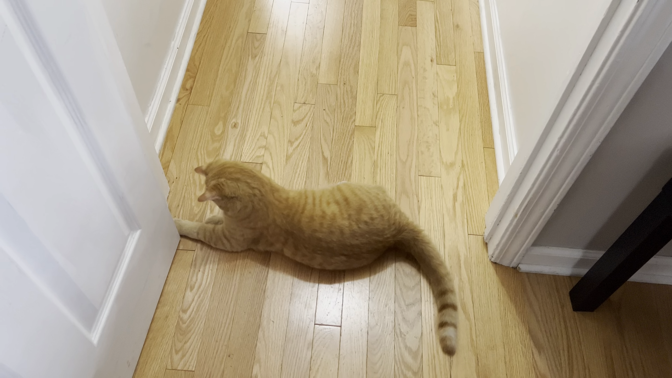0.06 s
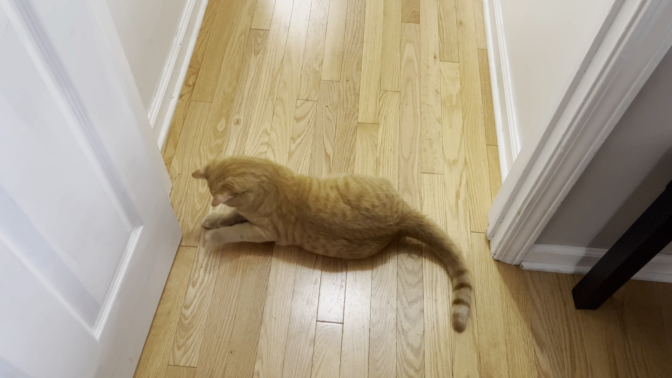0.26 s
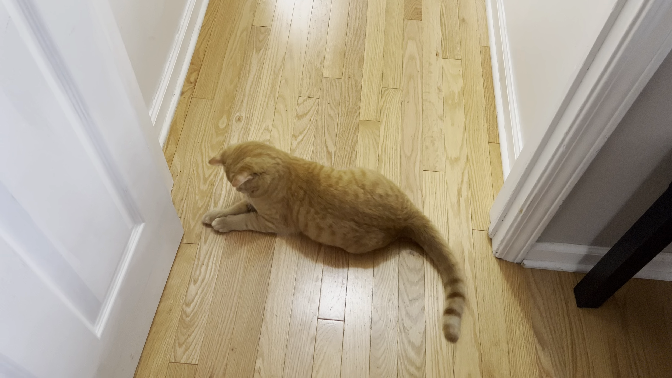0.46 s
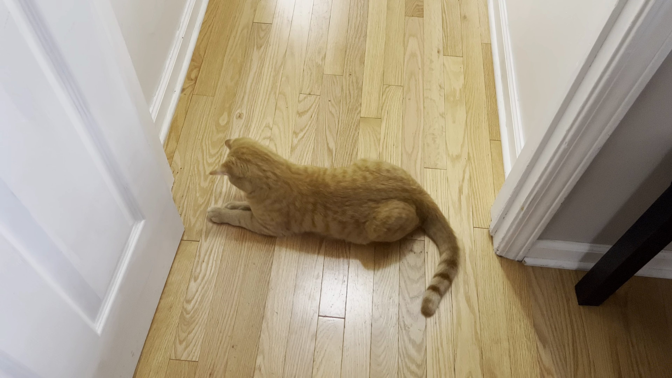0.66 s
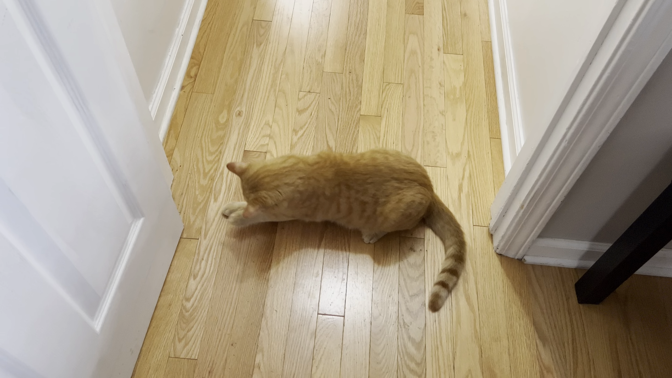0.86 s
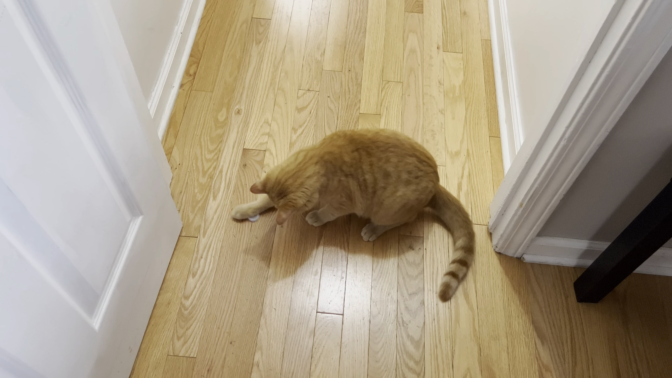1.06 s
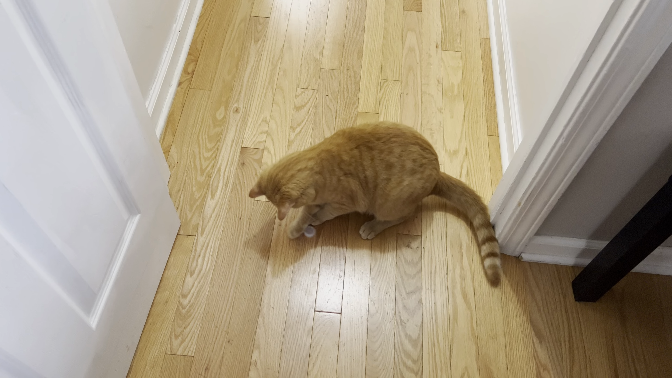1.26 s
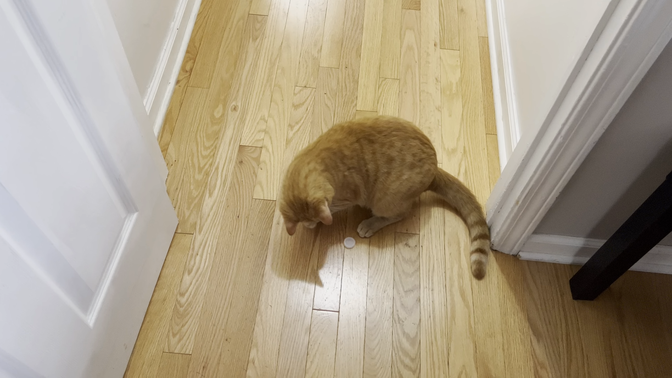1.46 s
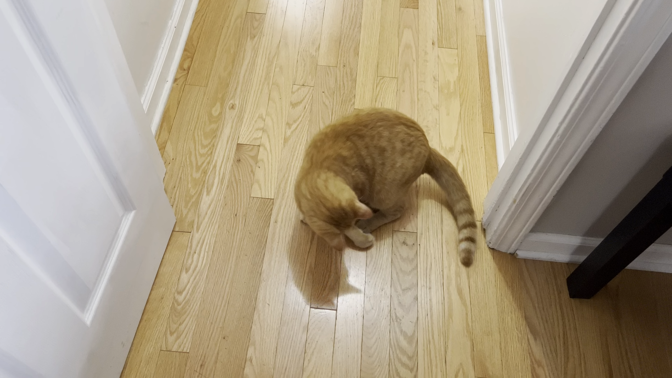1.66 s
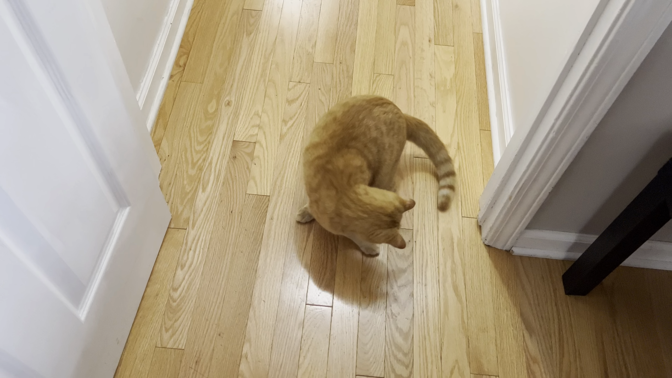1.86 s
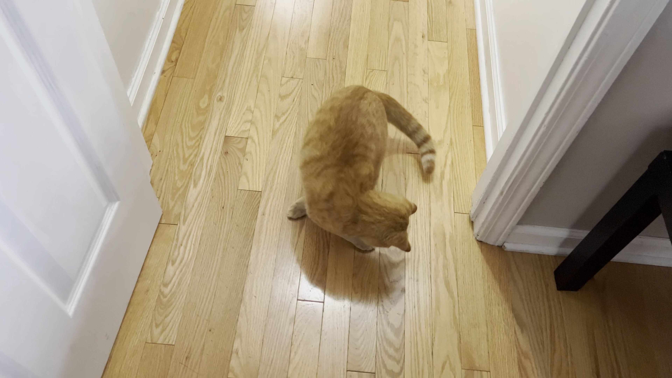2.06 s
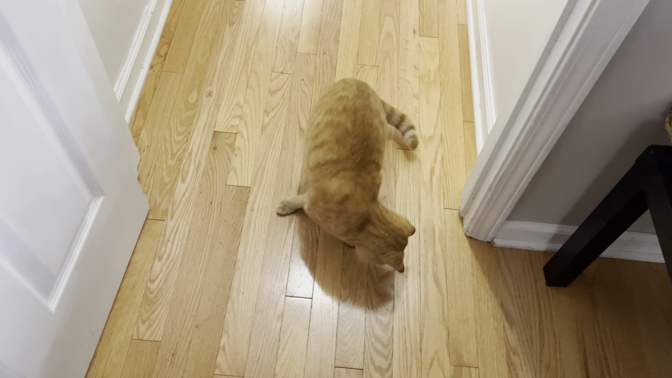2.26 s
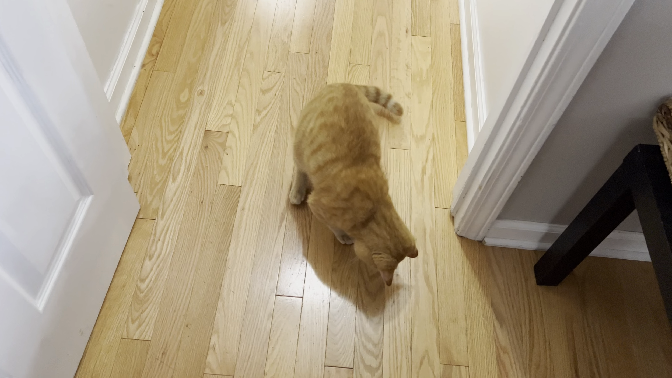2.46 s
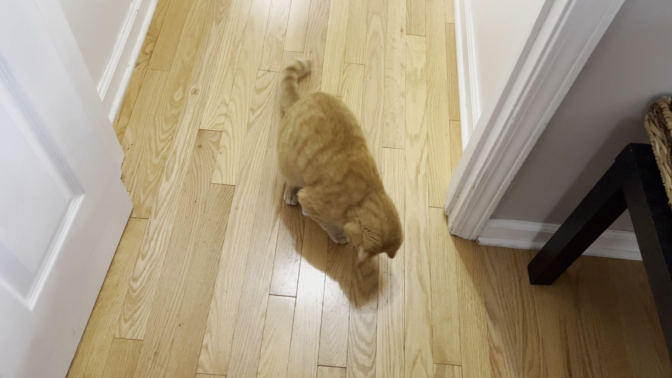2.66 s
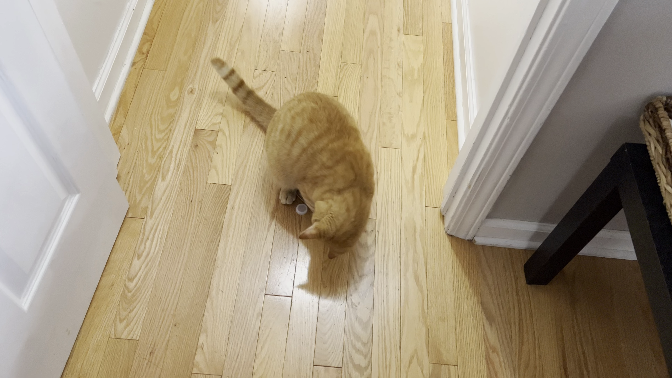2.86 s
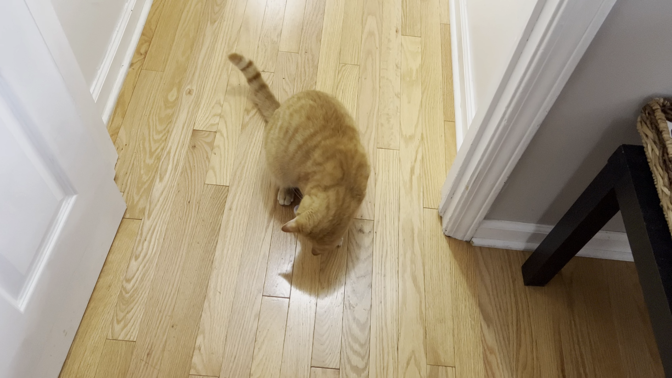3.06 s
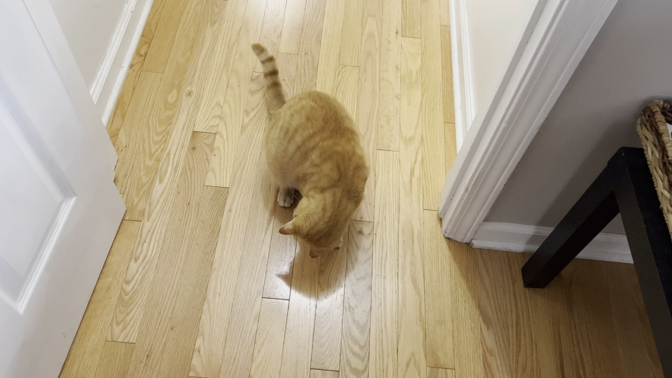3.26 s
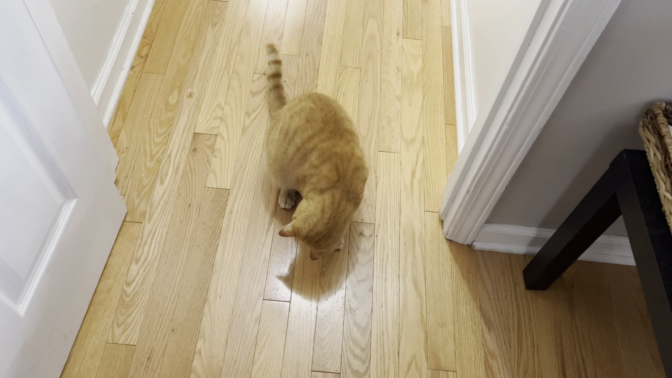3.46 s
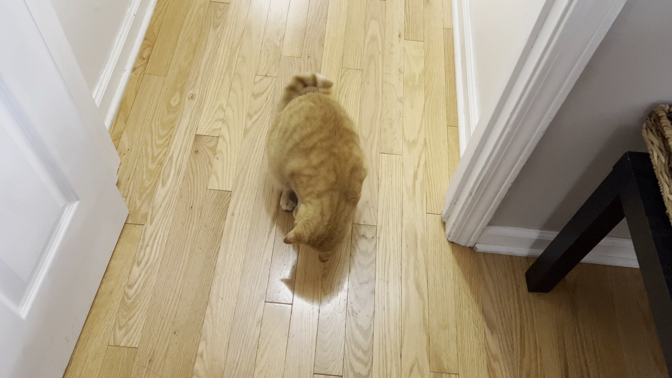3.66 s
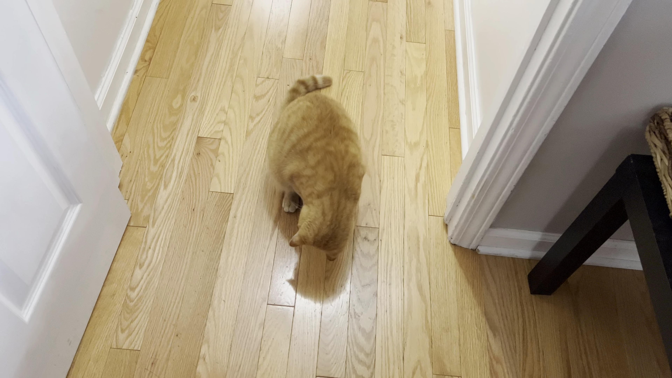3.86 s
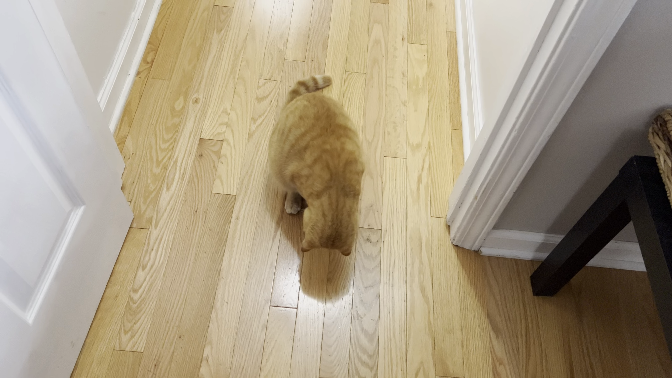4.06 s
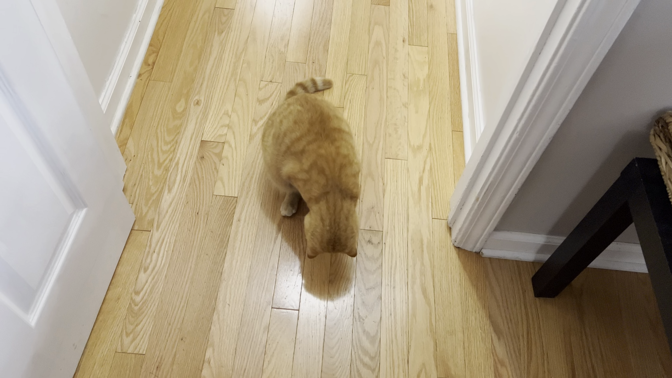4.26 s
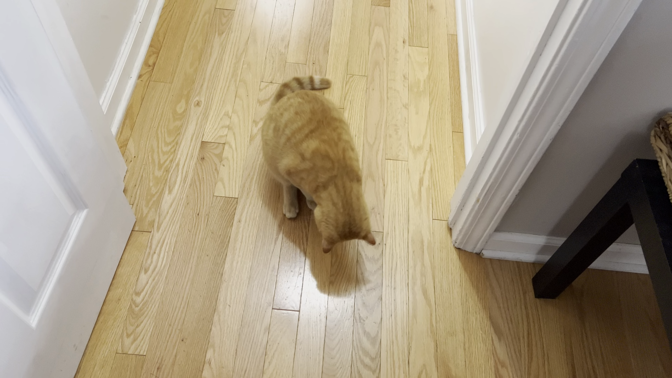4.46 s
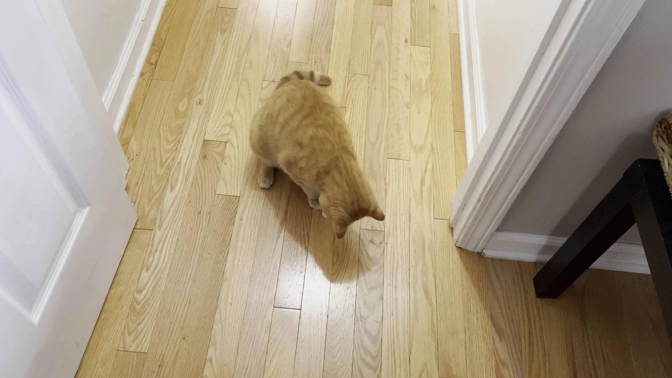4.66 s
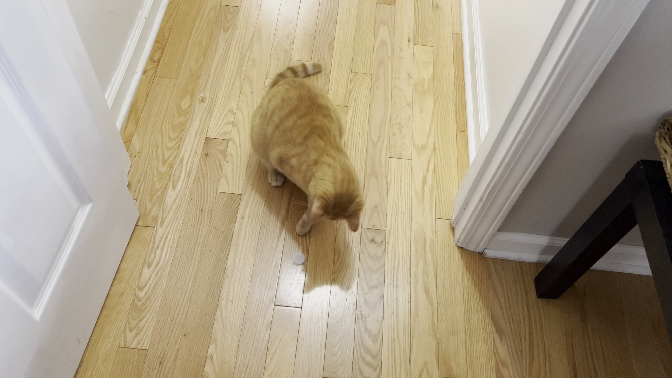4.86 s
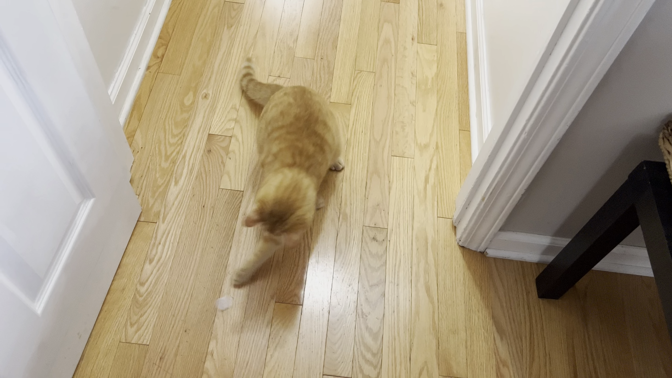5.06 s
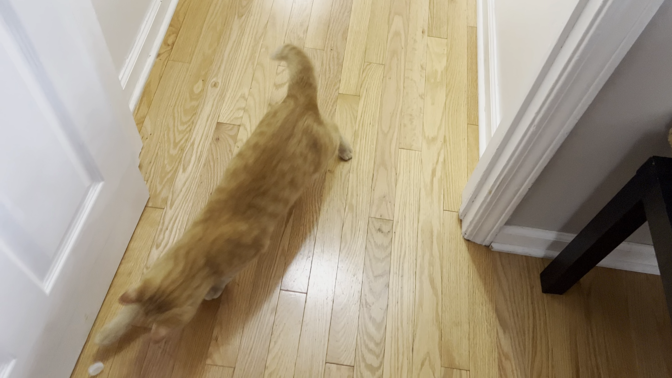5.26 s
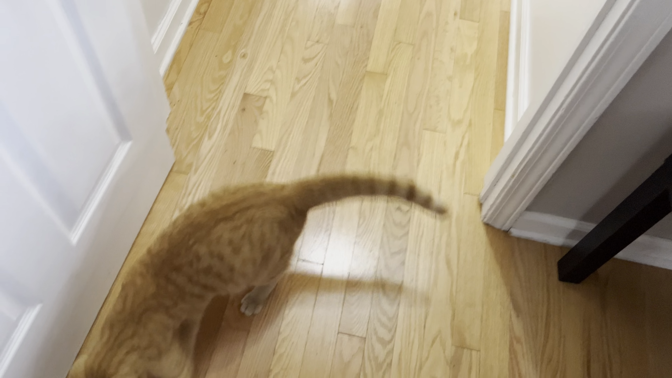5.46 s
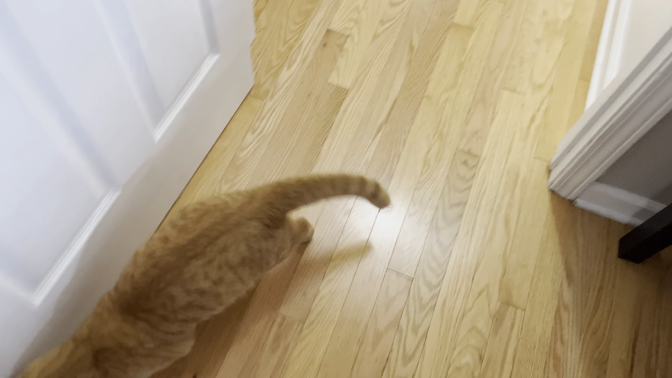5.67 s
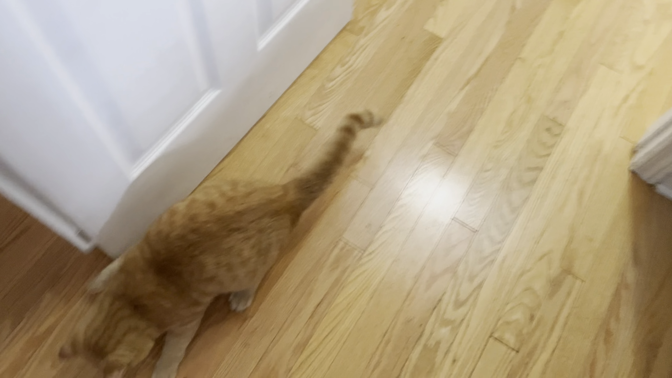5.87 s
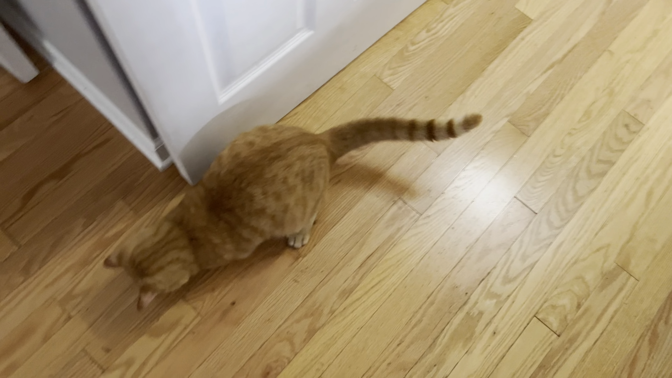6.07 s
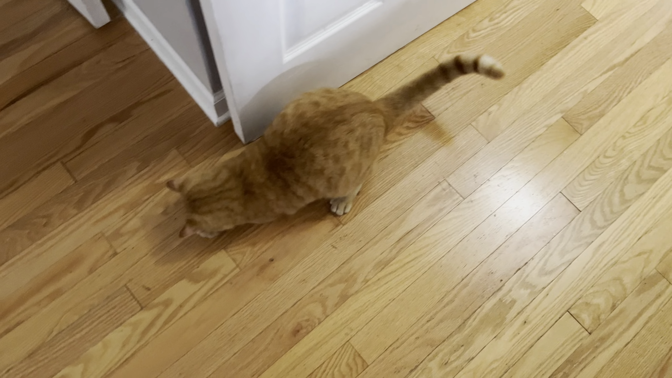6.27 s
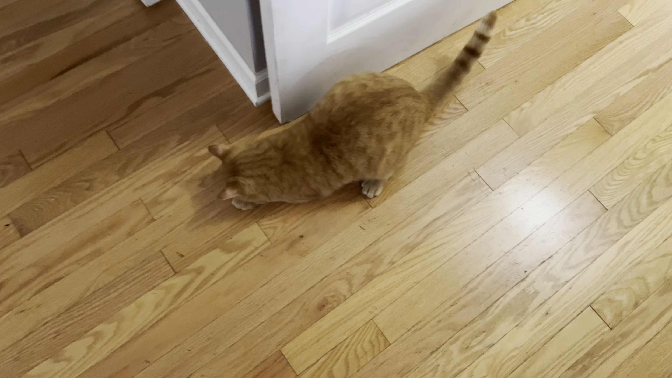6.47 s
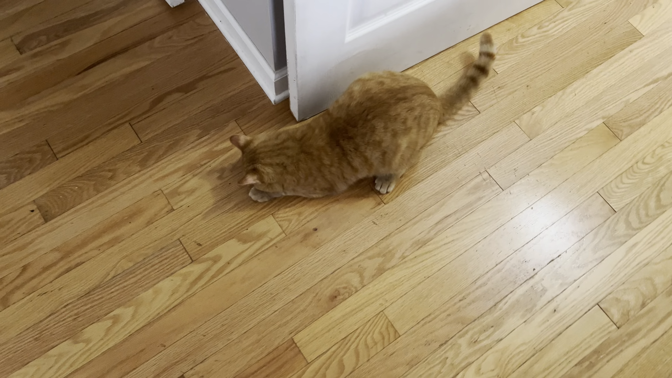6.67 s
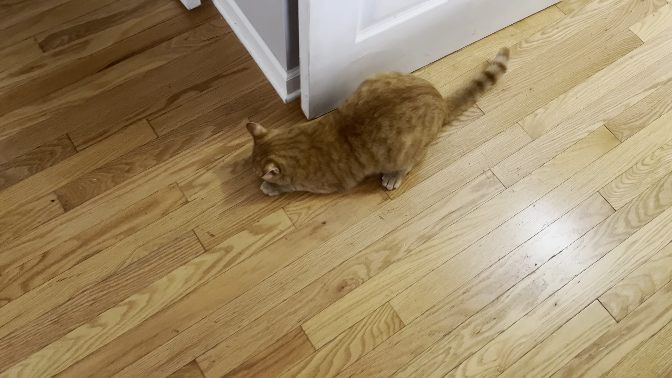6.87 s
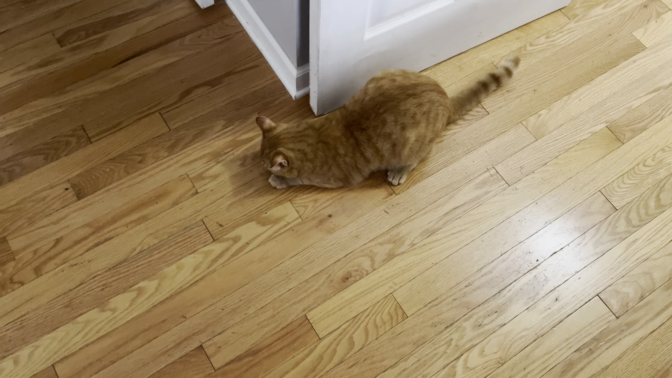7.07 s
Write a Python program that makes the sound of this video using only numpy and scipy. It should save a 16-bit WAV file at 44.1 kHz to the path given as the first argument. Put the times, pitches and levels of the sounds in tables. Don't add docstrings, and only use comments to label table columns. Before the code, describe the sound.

Light claw ticks and dry scratches on hardwood come first, followed by a harder swipe and the brittle click of a plastic cap. After scattered taps and near silence, the cat pounces: rapid clattering, scraping, dull paw thuds and a hollow door bump. A few softer scrapes and ticks end it. The indoor hallway gives short reverberation; the handheld microphone picks up handling rumble and quiet left-sided hiss.

```python
import sys
import numpy as np
from scipy import signal
from scipy.fft import rfft, irfft, next_fast_len
from scipy.io import wavfile
from scipy.ndimage import map_coordinates

SR = 44100
rng = np.random.default_rng(int(sys.argv[2]) if len(sys.argv) > 2 else 0)


def generate_wav(signal):
    frames = np.transpose(np.atleast_2d(signal))
    scaled = np.clip(frames, -1, 1) * 32767
    pcm = np.round(scaled).astype(np.int16)
    wavfile.write(sys.argv[1], SR, pcm)


def nominal_scale(level):
    x = np.asarray(level, float) / 20
    return 10 ** x


N = 313917
RIM_HZ = 13050


def unit(x):
    return x / np.sqrt(np.mean(x ** 2) + 1e-20)


def along(points, hz):
    f, v = np.transpose(points)
    return np.interp(np.log(hz + 1), np.log(f + 1), v)


def curves(rows):
    s, *cols = np.transpose(rows)
    return [np.interp(np.arange(N) / SR, s, c) for c in cols]


def filtered(x, response):
    m = next_fast_len(x.shape[-1] + 8192)
    return irfft(rfft(x, m) * response(np.fft.rfftfreq(m, 1 / SR)), m)[..., :x.shape[-1]]


def modes(table):
    def response(f):
        total = 0
        for k, (centre, width, db) in enumerate(table):
            resonance = 1j * f * width / (centre * centre - f * f + 1j * f * width)
            total = total + (-1) ** k * nominal_scale(db) * resonance
        return total
    return response


def ring(table):
    pulse = irfft(modes(table)(np.fft.rfftfreq(1024, 1 / SR)) ** 2)[:512]
    return pulse / np.linalg.norm(pulse)


def causal(spectrum):
    cep = irfft(np.log(nominal_scale(along(spectrum, np.fft.rfftfreq(1024, 1 / SR)))))
    cep[1:512] *= 2
    cep[513:] = 0
    pulse = irfft(np.exp(rfft(cep)))[:512]
    return pulse / np.linalg.norm(pulse)


def pair(alike):
    turn = lambda hz: np.arccos(np.clip(along(alike, hz), -1, 1)) / 2
    return lambda hz: np.array([np.cos(turn(hz)), np.sin(turn(hz))])


def swells(rows, steep=1):
    climb_db, tire_s = 20, .3
    t = np.arange(0, N + 32, 32) / SR
    s, peak_db, rise, fade = np.transpose(rows)[:, :, None]
    late = np.maximum(t - s, 0)
    early = np.maximum(s - t, 0) / np.maximum(rise, .001)
    loss = climb_db * early * (1 + early) / 2 + abs(fade) * late * (1 + late / tire_s)
    return np.interp(np.arange(N) / SR, t, np.sqrt(np.sum(nominal_scale(peak_db - steep * loss) ** 2, 0)))


def voices(pushes):
    # frequency in Hz, level in dB.
    scrape_spectrum = [(300, -27), (750, -6), (1200, 1.5), (2200, -2.5), (3100, -5), (3900, -1),
                       (4200, -11.5), (6000, -45.5), (12000, -58)]
    # frequency in Hz, width in Hz, level in dB.
    cap_modes = [(3824, 250, 3), (5200, 130, -15)]
    # frequency in Hz, level in dB.
    tip_spectrum = [(9000, -34.5), (11000, -13), (12300, -6.5), (13100, -2.5), (13900, -3.5), (15700, -5),
                    (17000, -30.5)]
    # frequency in Hz, level in dB.
    rasp_spectrum = [(1800, -29.5), (2800, -28), (4400, 8), (5400, 0.5), (7000, -1), (9300, -13),
                     (11500, -41), (16000, -50)]
    cap = ring(cap_modes) + nominal_scale(-19.5) * ring([(RIM_HZ, 900, 0)])
    bodies = np.array([causal(scrape_spectrum), cap, causal(tip_spectrum), causal(rasp_spectrum)])
    return signal.oaconvolve(pushes, bodies, axes=1)[:, :N].sum(0)


def hush():
    # frequency in Hz, level in dB per Hz.
    air_spectrum = [(71, -24.5), (120, -7.5), (167, -26), (226, -11.5), (418, -23.5), (605, -24),
                    (789, -28.5), (1010, -9.5), (1240, -16.5), (1750, -3), (2990, -30), (4060, -23.5),
                    (4590, -31), (7350, -31.5), (11300, -45), (13300, -31), (14200, -50.5), (16000, -52)]
    # frequency in Hz, left over right in dB.
    left_over_right = [(60, -10.5), (110, 5), (200, 5.5), (380, 1.5), (700, 2), (1290, 17), (2380, 12.5),
                       (4400, 12.5), (8120, 15), (15000, -10.5)]
    # frequency in Hz, level in dB rms.
    whine_tones = [(3957, -87)]

    def response(hz):
        left = 1 / (1 + nominal_scale(-along(left_over_right, hz)) ** 2)
        return nominal_scale(along(air_spectrum, hz)) * np.sqrt([left, 1 - left])

    air = nominal_scale(-69) * unit(filtered(rng.standard_normal((2, N)), response))
    whine = sum(nominal_scale(db + 1) * np.sin(2 * np.pi * hz * np.arange(N) / SR) for hz, db in whine_tones)
    return air + whine * nominal_scale([[4], [-10]])


def weight():
    # frequency in Hz, level in dB per Hz.
    rumble_spectrum = [(12, -39.5), (20, -30), (36, -8.5), (54, 6.5), (95, -5.5), (113, -10), (160, -15),
                       (210, -59.5), (350, -120)]
    # frequency in Hz, width in Hz, level in dB.
    board_modes = [(148, 130, -1.5), (208, 116, 2.5), (285, 38.6, 1), (378, 65, -6.5), (504, 65, -6.5),
                   (853, 280, -10)]
    # time of peak in s, peak in dB, rise in s, fade in dB per s.
    loads = [(0.2, -68.5, .8, 15), (0.34, -55, 0.039, 130), (0.7, -62.5, 0.69, 50), (1.12, -65, 0.18, 21),
             (1.88, -70, 0.45, 26), (2.42, -74, 0.21, 24), (3.75, -65.5, 0.04, 96),
             (4.35, -62.5, 0.077, 95), (5.2, -61.5, 0.16, 93), (5.25, -36, 0.025, 204),
             (5.46, -48.5, 0.022, 64), (5.59, -35, 0.017, 103), (5.7, -46.5, 0.61, 46),
             (5.88, -46.5, 0.078, 24), (6.45, -64, 0.79, 21.5), (6.6, -49.5, 0.16, 34),
             (7.12, -58, 0.17, 97.5)]
    # time in s, level in dB.
    grip = [(0.0, -66.5), (0.4, -54.5), (1.25, -55.5), (1.45, -62.5), (1.85, -57), (2.3, -58), (3.9, -64),
            (5.3, -59.5), (5.9, -43.5), (6.2, -64.5), (6.33, -52), (6.45, -62.5), (6.62, -55.5),
            (6.94, -63)]
    tremor = map_coordinates(rng.standard_normal(N // 5000 + 4), [np.arange(N) / 5000])
    rumble_db = curves(grip)[0] - 6 + 2 * tremor
    load = np.hypot(swells(loads), nominal_scale(-77.5))
    alike = pair([(60, 0.95), (300, 0.79), (700, 0.087)])

    def board_response(hz):
        band = 1 / (1 + (hz / 1000) ** 4) / (1 + (110 / (hz + 1)) ** 4)
        return modes(board_modes)(hz) * alike(hz) * band

    low = filtered(rng.standard_normal((2, N)), lambda hz: nominal_scale(along(rumble_spectrum, hz)) * alike(hz))
    board = filtered(rng.standard_normal((2, N)), board_response)
    mid, side = np.sqrt(2) * (nominal_scale(rumble_db) * unit(low) + nominal_scale(-10.0) * load * unit(board))
    return np.array([mid + side, mid - side]) * nominal_scale([[1.1], [-1.1]])


def grains(rate, spread_db, hiss):
    slips = (rng.random(N) < rate / SR) * np.sign(rng.standard_normal(N)) * nominal_scale(spread_db * rng.random(N))
    return unit(unit(slips) + hiss * rng.standard_normal(N))


def strokes():
    # time of peak in s, peak in dB, rise in s, fade in dB per s, rasp in dB.
    scratches = [(0.057, -54, 0.19, 140, -12.5), (0.25, -59, 0.051, 146, -17),
                 (0.356, -60, 0.093, 194, -18), (0.54, -61, 0.022, 125, -16),
                 (0.648, -54, 0.019, 121, -7.5), (1.035, -58, 0.043, 302, -11), (1.106, -44, 0.054, 64, -3),
                 (2.503, -48.5, 0.054, 229, -10.5), (3.616, -51.5, 0.0046, 80, -9.5),
                 (4.94, -59, 0.07, 60, -28), (5.095, -63, 0.0041, 35, 4), (5.24, -61, .01, 124, 9),
                 (5.364, -52.5, 0.037, 300, -5.5), (5.788, -58.5, 0.0098, 152, 7.5),
                 (5.943, -57.5, 0.023, 300, 3.5), (5.985, -67, .012, 190, 9),
                 (5.583, -41, 0.0015, 500, -24), (5.601, -56.5, .004, 39, 2.5),
                 (6.199, -76, 0.046, 69, 5.5), (6.39, -69, 0.11, 96, 3.5), (6.509, -60.5, 0.034, 88, 3),
                 (6.7, -60.5, 0.18, 68, 0.5), (7.12, -66, 0.058, 106, -7)]
    # time of peak in s, peak in dB, rise in s, fade in dB per s, cap ring in dB.
    skids = [(1.062, -41.5, 0.0057, 46, -9), (1.16, -51, .08, 86, 5), (1.315, -57, 0.0035, 29, -5),
             (1.655, -47.5, 0.018, 190, -3.5), (1.795, -53.5, 0.017, 51, 5), (2.515, -60, 0.027, 50, 4.5),
             (2.665, -60.5, .01, 94, 3.5), (4.09, -67.5, 0.0036, 46.5, 5), (4.645, -67, 0.048, 402, -9),
             (4.7, -63.5, 0.015, 91, 3), (4.748, -58.5, 0.0066, 204, 4), (4.83, -55, 0.076, 294.5, 0.5),
             (4.888, -61, 0.015, 248.5, -2), (5.03, -53.5, 0.0066, 24, -6), (5.18, -58.5, 0.048, 66.5, 5.5),
             (5.238, -43, 0.087, 151, 9), (5.35, -68.5, .05, 54, 10), (5.52, -56, 0.2, 106, -9),
             (5.785, -44.5, 0.0082, 302, -10), (5.81, -57, 0.016, 30, 1.5), (5.98, -59, 0.3, 62, -1),
             (6.12, -68, 0.037, 10, 1.5), (6.685, -71, 0.016, 198, -24)]
    # time in s, gain of the tips in dB.
    claws_out = [(0.0, -2), (1.5, 0.5), (2.2, -6), (4.6, -8), (4.75, 1.5), (5.0, 2), (5.25, 2), (5.5, 12.5),
                 (5.65, 27.5), (5.8, 6), (6.3, 16), (7.12, 19)]
    scratch_cap_db, skid_rasp_db, tip_db = -15, -14.5, -15.5
    slow_hz, slow_db, hz_per_db = 1962, -64, 43.5
    dragged = [(*row[:4], scratch_cap_db, row[4]) for row in scratches]
    rows = np.array(dragged + [(*row, skid_rasp_db) for row in skids])

    def voice(over_db, steep):
        return swells(rows[:, :4] + np.outer(over_db + 0 * rows[:, 0], [0, 1, 0, 0]), steep)

    scrape = voice(0, 0.96)
    cap = voice(rows[:, 4], 1.5)
    tips = np.hypot(voice(tip_db, 1.3), nominal_scale(-100)) * nominal_scale(curves(claws_out)[0])
    rasp = voice(rows[:, 5], 1.44)
    pitch_hz = slow_hz + hz_per_db * np.maximum(20 * np.log10(scrape + 1e-9) - slow_db, 0)
    return np.array([scrape, cap, tips, rasp]), pitch_hz


def slide():
    levels, pitch_hz = strokes()
    pressure = map_coordinates(rng.standard_normal(N // 900 + 4), [np.arange(N) / 900])
    rub = unit(nominal_scale(3 * np.tanh(pressure)) * grains(1100, spread_db=6, hiss=0.75))
    rattle = unit(grains(160, spread_db=11.0, hiss=0.21) + 0.36 * rub)
    hz, t, z = signal.stft(rub, SR, nperseg=256)
    drift = map_coordinates(rng.standard_normal(len(t) // 30 + 4), [np.arange(len(t)) / 30])
    centre = np.interp(t, np.arange(N) / SR, pitch_hz) * (1 + .07 * drift)
    peak = 0.4 + sum(1 / (1 + ((hz[:, None] - k * centre) / 170) ** 2) for k in (.75, 1.05, 1.6))
    scrape = 1.47 * signal.istft(z * peak, SR, nperseg=256)[1][:N]
    return voices(nominal_scale(-3.5) * levels * [scrape, rattle, unit(rattle + rub), rub])


def contacts():
    # start in s, peak in dB, board pitch in Hz, sharpness in dB.
    claw_falls = [(0.049, -39, 2130, -14), (0.227, -44, 2460, -28), (0.2547, -42, 1700, -44),
                  (0.336, -44, 2050, -20), (0.5553, -45.5, 1720, -29), (1.034, -32, 1700, -23),
                  (1.2413, -31, 2080, -20.5), (1.6352, -40, 1660, -26), (1.6554, -34.5, 1430, -25),
                  (1.7943, -26.5, 2970, -19), (1.8355, -29.5, 3140, -10), (3.6156, -27.5, 2400, -28.5),
                  (3.68, -28, 2140, -26.5), (4.168, -37.5, 2040, -39), (5.0294, -23.5, 2370, -29),
                  (5.1309, -31, 2750, -21), (5.5789, -24, 2600, -14), (5.9325, -41, 1850, -16),
                  (6.4974, -41.5, 3670, -15), (6.6658, -41.5, 2110, -22), (6.684, -32.5, 2030, -16)]
    # start in s, peak in dB, board pitch in Hz, cap ring in dB.
    cap_bats = [(0.649, -37.5, 2340, -11), (1.059, -19.5, 2980, -14), (1.314, -33, 1700, -8),
                (1.335, -30.5, 2340, -5), (1.8463, -22, 2280, -13), (2.4734, -34, 2330, -18),
                (2.6364, -29, 1660, -7), (2.6588, -31.5, 2000, -5.5), (4.089, -36, 2280, -9.5),
                (4.7436, -44.5, 1510, -1.5), (4.808, -45.5, 1530, -8), (4.881, -44, 1390, -16.5),
                (5.0392, -32.5, 2260, -19.5), (5.092, -36.5, 1680, -11), (5.1471, -26.5, 2580, -9.5),
                (5.194, -27.5, 2800, -12.5), (5.231, -18.5, 3060, -4.5), (5.2353, -28, 3070, -8),
                (5.243, -22, 2900, -2.5), (5.459, -34, 2370, -0.5), (5.5277, -26.5, 2300, -17),
                (5.7813, -31, 1850, -6), (5.8753, -34.5, 2170, -1.5), (5.9663, -37, 1930, -0.5),
                (6.0634, -40.5, 2210, -16)]
    # start in s, tip level in dB, rasp over tip in dB.
    tip_ticks = [
        (2.463, -60, -2),
        (5.0388, -46, -14),
        (5.0907, -42, -5),
        (5.1938, -41, 3.5),
        (5.2358, -50.5, 14.5),
        (5.378, -51, 2),
        (5.427, -58, 6),
        (5.976, -48.5, -8),
        (6.666, -58, -8),
        (7.022, -58.5, -8.5),
    ]
    claw_cap_db, claw_tip_db = -20, -6.5
    bat_tip_db, bat_rasp_db = -31, -25
    tick_board_db, tick_board_hz = -11, 1700
    claws = [(s, db, claw_cap_db, sharp + claw_tip_db, sharp, hz) for s, db, hz, sharp in claw_falls]
    bats = [(s, db, cap, bat_tip_db, bat_rasp_db, hz) for s, db, hz, cap in cap_bats]
    ticks = [(s, db + tick_board_db, claw_cap_db, -tick_board_db, rasp - tick_board_db, tick_board_hz)
             for s, db, rasp in tip_ticks]
    return claws + bats + ticks


def taps():
    scuff_s, rebound_db = .0007, -8
    push, knocks, t = np.zeros((4, N + SR)), np.zeros(N + SR), np.arange(SR // 20) / SR
    table = contacts()
    chance = rng.random((len(table), 2, 6))
    u = t[:SR // 200] / scuff_s
    scuffs = rng.standard_normal((len(table), 6, len(u))) * u * np.exp(-u)
    scuffs /= np.linalg.norm(scuffs, axis=2, keepdims=True)
    for (s, db, cap_db, tip_db, rasp_db, hz), (when, size), scuff in zip(table, chance, scuffs):
        lag = .002 * (np.cumsum(when + .5) - when[0] - .5)
        blow_db = db - 420 * lag + (rebound_db - 3.5 * size) * (lag > 0)
        blows = nominal_scale(blow_db) * np.sign(when - .5)
        at = ((s + lag) * SR).astype(int)
        shares = nominal_scale([-3, cap_db + 13.5, tip_db + 23.0, rasp_db + 16])
        spot = nominal_scale(-3.5 - 60 * t / 0.0056) * np.sin(2 * np.pi * hz * t) * (1 - np.exp(-t / 0.0001))
        for start, blow, grit in zip(at, blows, scuff):
            knocks[start:start + len(t)] += blow * spot
            push[1, start] += shares[1] * blow
            push[[0, 2, 3], start:start + len(u)] += shares[[0, 2, 3], None] * blow * grit
    return voices(push[:, :N]) + knocks[:N]


def thumps(table, rough, rise, sag=0):
    sag_s = 0.0098
    out, t = np.zeros(N + SR), np.arange(SR // 3) / SR
    for s, db, hz, t60 in table:
        knock = np.sin(2 * np.pi * hz * (t + sag * sag_s * (1 - np.exp(-t / sag_s))))
        body = modes([(1.1 * hz, .7 * hz, 0)])
        grit = unit(filtered(rng.standard_normal(len(t)), lambda f: body(f) ** 2))
        swell = (1 - np.exp(-t / rise)) ** 2
        out[round(s * SR):][:len(t)] += nominal_scale(db - 60 * t / max(t60, .01)) * swell * (knock + rough * grit)
    return out[:N]


def paws():
    # start in s, peak in dB, pitch in Hz, t60 in s.
    pad_falls = [(0.322, -41.5, 134, 0.091), (0.35, -47, 159, 0.15), (2.215, -52.5, 120, 0.13),
                 (2.93, -51, 187, 0.072), (4.345, -41.5, 98, 0.12), (4.335, -49, 229.4, 0.098),
                 (0.685, -57, 163, 0.68), (2.192, -52, 170, 0.14), (2.438, -60.5, 152, 0.21),
                 (2.906, -56.5, 194, 0.12), (3.415, -51, 197, 0.039), (4.316, -45, 147, 0.14),
                 (5.091, -45.5, 145, 0.094), (5.237, -30.5, 126.6, 0.1), (5.375, -36, 201, 0.096),
                 (5.451, -31, 126.6, 0.15), (5.66, -29, 99.5, 0.078), (5.678, -36, 163, 0.19),
                 (5.863, -27.5, 158, 0.086), (5.901, -20.5, 99, 0.049), (5.934, -42.5, 210, 0.15),
                 (6.596, -32.5, 99, 0.09), (6.629, -56, 196, 0.16), (7.029, -51.5, 137, 0.074)]
    # start in s, peak in dB, pitch in Hz, t60 in s.
    board_creaks = [
        (3.415, -58.5, 564, 0.031),
        (3.417, -86, 900, 0.0099),
        (3.755, -58.5, 514, 0.097),
        (3.755, -60, 986, 0.044),
        (5.444, -41, 496, 0.076),
        (5.527, -45, 506, 0.088),
        (5.579, -38, 546, 0.042),
        (5.94, -41.5, 480, 0.14),
        (6.683, -48, 434, 0.045),
    ]
    # start in s, peak in dB, pitch in Hz, t60 in s.
    door_bumps = [
        (0.319, -59.5, 281, 0.33),
        (0.455, -60, 285.4, 0.54),
        (0.704, -53.5, 294.7, 0.28),
        (0.801, -61, 285.7, 0.43),
        (5.447, -36.5, 280.6, 0.21),
        (5.585, -32, 300, 0.33),
        (5.607, -33.5, 346, 0.15),
    ]
    knocks = thumps(pad_falls, rough=0.48, rise=0.003, sag=0.32)
    knocks = knocks + thumps(board_creaks, rough=0.75, rise=0.00014)
    knocks = knocks + thumps(door_bumps, rough=0.058, rise=0.00032)
    return filtered(knocks, lambda hz: (1j * hz / (70 + 1j * hz)) ** 2)


def clicks(rows):
    s, db, hz, t60 = np.transpose(rows)[:, :, None]
    t = np.arange(SR // 25) / SR
    decay = nominal_scale(db - 60 * t / np.maximum(t60, .001))
    rings = decay * np.sin(2 * np.pi * hz * t) * (1 - np.exp(-t / .0003)) ** 2
    at = (s * SR).astype(int) + np.arange(len(t))
    return np.bincount(at.ravel(), rings.ravel(), N + SR)[:N]


def clatter():
    # start in s, cap ring in dB, board over cap in dB.
    hops = [(5.0404, -35.5, 12), (5.0508, -40, 6.5), (5.056, -37, -6.5), (5.0693, -42, -0.5),
            (5.0859, -47, -1), (5.0927, -32, -3), (5.1087, -35.5, -3.5), (5.122, -39, -1.5),
            (5.1288, -43, 3.5), (5.141, -36, 0), (5.1478, -42, -8), (5.1573, -39.5, -1), (5.165, -31.5, 6),
            (5.1759, -39, -5), (5.185, -38.5, -4), (5.1948, -29.5, -10.5), (5.2017, -31.5, 2),
            (5.21, -25.5, -7.5), (5.2187, -29.5, -4), (5.2253, -29.5, -7.5), (5.236, -15.5, -22),
            (5.2445, -25.5, -11.5), (5.2513, -28, -10.5), (5.2602, -42, -5), (5.2694, -44.5, -11.5),
            (5.2833, -48, -11), (5.3014, -38.5, -13), (5.3228, -46, -7), (5.3315, -55, -2),
            (5.3403, -33, -24), (5.361, -48, -9), (5.3746, -33, -13), (5.3831, -62, 2), (5.3953, -51, -4),
            (5.4101, -50, -7), (5.4268, -52, -11), (5.4502, -44, -11), (5.4595, -44.5, -13),
            (5.479, -48, -5), (5.496, -48, -9), (5.5046, -56, -9), (5.5112, -52, -3), (5.5212, -38, -16),
            (5.528, -34.5, 4), (5.5379, -42, -6), (5.5542, -55, -5), (5.5625, -52, 1),
            (1.2877, -49, -8), (1.2939, -46, 11), (1.3145, -37, -15), (1.3354, -41, 3), (1.3553, -46, -4),
             (1.3633, -47, -3), (1.3717, -49, 6), (1.415, -50, 11), (1.4663, -57, 10), (1.4793, -54, 17),
             (1.4887, -56, -2), (1.4991, -53, 18.5), (1.509, -56, -2), (4.6174, -57, 9),
             (4.6433, -56.5, 19), (4.6915, -69, 9), (4.7147, -65, 4), (4.7474, -51.5, 15),
             (4.7595, -48, -13), (4.7924, -58, 2), (4.81, -48, -1), (4.8173, -49, 7), (4.8285, -47, -1),
             (4.8369, -58, -8), (4.845, -49, -3), (4.8849, -60, 2), (4.9127, -53, 11), (4.9394, -52, 10),
             (4.9626, -52, 7), (5.7818, -27.5, -10), (5.789, -30.5, -12), (5.8094, -55, -2),
             (5.8373, -52, -9), (5.876, -42, -5), (5.8931, -41, -1), (5.9418, -54, -2), (5.9519, -40, -9),
             (5.9675, -43, -8), (5.9851, -37, -20), (5.9987, -59, -10), (6.0159, -44, -19),
             (6.0273, -62, -14), (6.0816, -57, -6), (6.095, -62, 0), (6.1107, -53, 2), (6.1164, -55, -13),
             (6.1256, -53, -12), (6.137, -52, -3), (6.266, -62, -4)]
    # start in s, peak in dB, pitch in Hz, t60 in s.
    hard_knocks = [(1.7964, -18.5, 3340, 0.0064), (1.7961, -29.5, 2030, 0.0079),
                   (1.8365, -25, 3230, 0.0057), (1.8495, -29, 3140, 0.0073), (5.233, -23, 4400, .005),
                   (5.2358, -10, 4320, 0.0052), (5.2363, -20.5, 5470, 0.0062), (5.579, -19, 2380, 0.0062),
                   (5.581, -18, 4330, 0.0049), (5.5881, -23.5, 1960, 0.0088), (5.7885, -42, 2700, 0.0033)]
    # start in s, peak in dB.
    grain_catches = [
        (1.0665, -33),
        (1.097, -38),
        (1.1035, -34),
        (1.1117, -37),
        (1.1227, -36),
        (1.134, -35),
        (1.1557, -36),
        (1.1655, -35),
    ]
    # time in s, pitch in Hz.
    board_spots = [
        (1.3, 2000),
        (4.6, 1600),
        (4.9, 1600),
        (5.04, 2200),
        (5.15, 2650),
        (5.22, 2800),
        (5.5, 2300),
        (6.2, 2000),
    ]
    hop_hz, hop_spread, spot_spread = 3817, 0.034, 0.17
    catch_low_hz, catch_high_hz, catch_t60_s = 2400, 4600, 0.005
    s, db, board_db = np.transpose(hops)
    edge, spot = rng.random((len(s), 2)).T
    cap_hz = hop_hz * (1 + hop_spread * (2 * edge - 1))
    board_hz = np.interp(s, *np.transpose(board_spots)) * (1 + spot_spread * (2 * spot - 1))
    rim_hz = RIM_HZ * (1 + hop_spread * (edge - spot))
    cap = np.transpose([s, db, cap_hz, 0.02 + 0 * s])
    board = np.transpose([s, db + board_db - 4, board_hz, 0.0074 + 0 * s])
    rim = np.transpose([s, db - 22, rim_hz, .012 + 0 * s])
    pitches = catch_low_hz * (catch_high_hz / catch_low_hz) ** rng.random((len(grain_catches), 2))
    catches = [(at, level, hz, catch_t60_s)
               for (at, level), both in zip(grain_catches, pitches) for hz in both]
    return clicks(np.vstack([cap, board, rim, catches, hard_knocks]))


def hall(x):
    # frequency in Hz, t60 in s.
    hall_t60 = [(200, 0.47), (1300, 0.38), (3500, 0.37), (9000, 0.31), (14000, 0.31)]
    # frequency in Hz, left-right likeness from -1 to 1.
    hall_alike = [(100, 1), (400, 0.21), (800, -0.32), (5000, -0.32), (8000, 0.11), (12000, 0.17)]
    step, long = SR // 4, SR // 2
    out = np.zeros((2, N + SR))
    for at in range(0, N, step):
        hz, t, z = signal.stft(rng.standard_normal((2, long)), SR, nperseg=256)
        z = z * nominal_scale(-60 * t / along(hall_t60, hz)[:, None]) * pair(hall_alike)(hz)[:, :, None]
        z = z / np.sqrt(np.sum(abs(z) ** 2, axis=(0, 2), keepdims=True))
        mid, side = signal.istft(z, SR, nperseg=256)[1][:, :long]
        tail = np.array([mid + side, mid - side])
        wet = signal.fftconvolve(x[None, at:at + step], tail / np.linalg.norm(tail[0]), axes=1)
        out[:, at + 90:at + 90 + wet.shape[1]] += wet
    return out[:, :N]


def scene():
    # frequency in Hz, phase lead of the left port in radians.
    port_lead = [(300, 2.5), (1000, 2), (2500, 1), (4500, 1.66), (7200, -2), (9600, -1.5), (11500, 2.5),
                 (16000, -2)]
    cat = taps() + slide() + clatter()
    thud = paws()
    near = filtered(cat, lambda hz: np.exp(.5j * np.outer([1, -1], along(port_lead, hz))))
    sent = filtered(cat, lambda hz: nominal_scale(-4.0) / (1 + (hz / 13500) ** 4))
    room = hall(sent + nominal_scale(-7) * thud)
    return (near + room) * nominal_scale([[.4], [-.4]]) + thud * nominal_scale([[1.1], [-1.1]]) + weight() + hush()


def roll_off(x):
    return signal.sosfilt(signal.butter(12, 16590, fs=SR, output="sos"), x)


def record(dry):
    # frequency in Hz, gain in dB.
    mic_response = [(22, -6), (45, 0), (7000, 1.5), (9300, 3), (9800, 1.5), (10500, -9), (11200, 0.5),
                    (13200, -6.5), (15600, -17.5), (15850, -29.5), (16500, -31), (16700, -65.5)]
    heard = filtered(dry, lambda hz: nominal_scale(along(mic_response, hz)))
    return roll_off(heard)


dry = scene()
out = record(dry)
generate_wav(out)
```